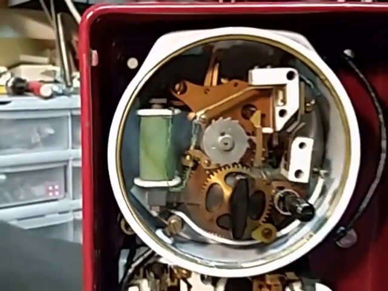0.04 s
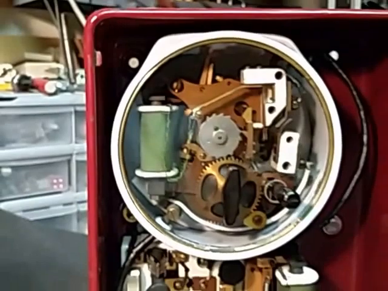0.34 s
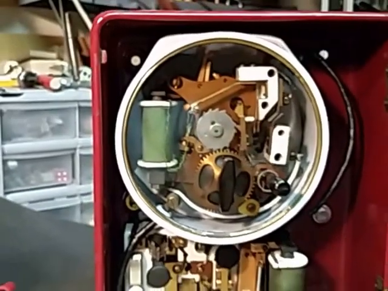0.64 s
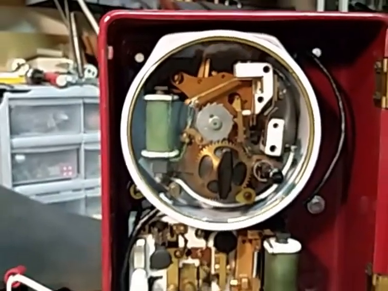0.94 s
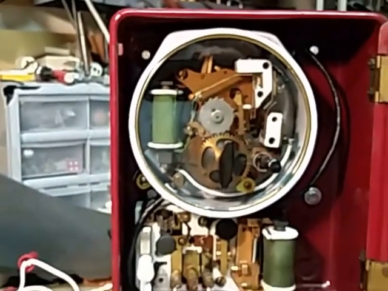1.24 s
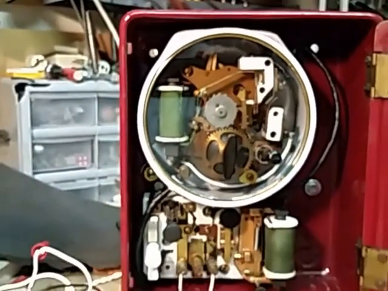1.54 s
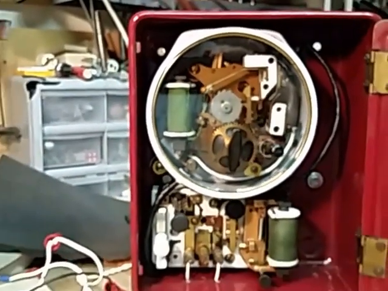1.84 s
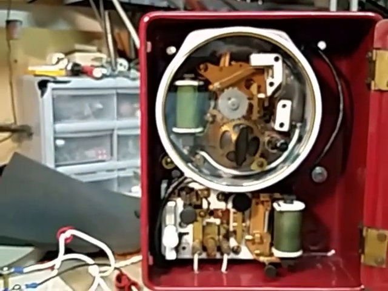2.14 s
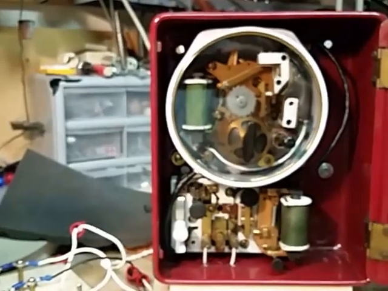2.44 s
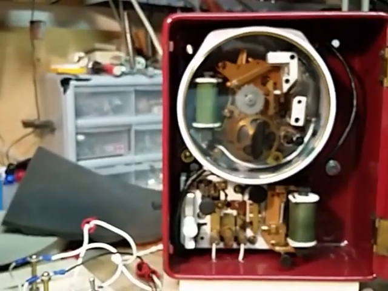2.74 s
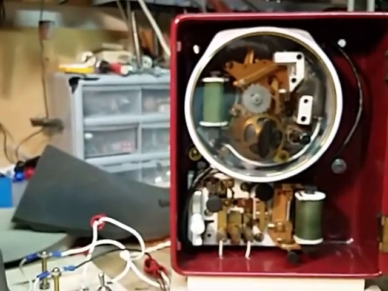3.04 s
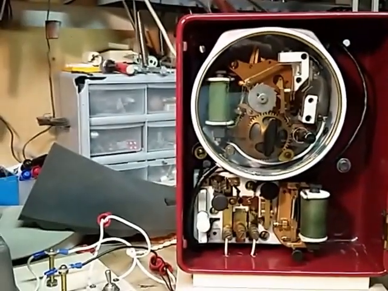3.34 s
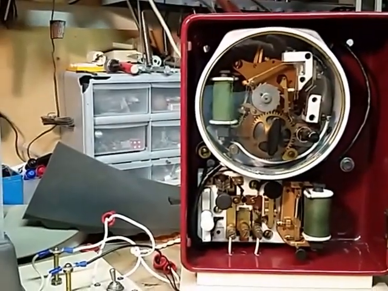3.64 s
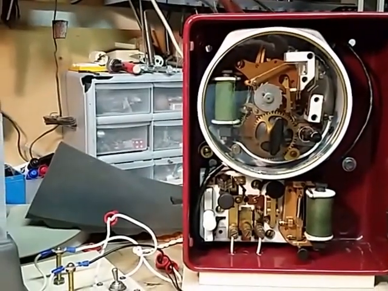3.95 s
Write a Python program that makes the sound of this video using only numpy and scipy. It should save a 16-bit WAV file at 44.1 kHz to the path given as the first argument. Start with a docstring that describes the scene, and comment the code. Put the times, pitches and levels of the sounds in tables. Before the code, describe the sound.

Brass clockwork ticks rapidly in a steel case, with two louder lever clacks.

```python
"""In a workshop, close by, a brass clockwork runs down in a steel case. Its pallet strikes the escape
wheel about twelve times a second, swings back with a lighter tap and often rattles once more. Twice,
two seconds apart, a lever knocks as it lifts, then drops with a loud, bouncing clack. Each blow rings
the plates (bright) and the case (hollow). The ticking shifts colour as the microphone backs away,
and faint room air lies underneath."""
import sys
import numpy as np
from scipy import signal
from scipy.fft import rfft, irfft
from scipy.io import wavfile

SR = 44100
rng = np.random.default_rng(int(sys.argv[2]) if len(sys.argv) > 2 else 0)


def transcribe(signal):
    """Save signal, clipped to [-1, 1], as a 16-bit WAV file at the path in sys.argv[1]."""
    frames = np.atleast_2d(signal).T
    limited = np.clip(frames, -1, 1)
    pcm = np.round(limited * 32767).astype(np.int16)
    wavfile.write(sys.argv[1], SR, pcm)


N = 176400

# how alike left and right are (frequency [Hz], correlation [0..1])
STEREO_LIKENESS = [(60,0.9),(170,0.95),(600,0.86),(1200,0.38),(4000,0.077)]
LN_1000 = np.log(1000)  # a decay of 60 dB


def undb(db):
    """Decibels to gain."""
    return 10 ** (np.asarray(db) / 20)


def along(points, hz):
    """Read (frequency [Hz], value) points on a log-frequency axis."""
    freqs, values = np.array(points, float).T
    return np.interp(np.log(np.maximum(hz, 1)), np.log(freqs), values)


def bins():
    """Frequencies of the spectrum of the whole scene."""
    return np.arange(N // 2 + 1) * SR / N


def add(out, start_s, sound):
    """Mix a sound in at its time."""
    i = max(int(start_s * SR), 0)
    out[..., i:i + sound.shape[-1]] += sound[..., :N - i]


def pan(hz):
    """Equal-power left and right gains: each frequency leans its own way."""
    # stereo lean (frequency [Hz], left minus right [dB])
    balance = [(300,-1),(1000,-3),(1450,-8.5),(2100,-1),(3000,3.5),(4000,5),(5000,0.5),(7200,5),(8800,-8),(15000,-9.5)]
    lean = undb(along(balance, hz))
    return np.array([lean, np.ones_like(lean)]) * np.sqrt(2 / (1 + lean ** 2))


def stereo(spectra):
    """Two unrelated spectra become left and right: narrow in the bass, wide in the treble."""
    likeness = along(STEREO_LIKENESS, bins())
    mid = spectra[0] * np.sqrt((1 + likeness) / 2)
    side = spectra[1] * np.sqrt((1 - likeness) / 2)
    return irfft(np.array([mid + side, mid - side]) * pan(bins()), N)


def glint(noise, width_hz, depth_db=6.5):
    """Metallic glint: narrow groups of modes are raised and lowered at random."""
    n = noise.shape[-1]
    hz = np.arange(n // 2 + 1) * SR / n
    ripple = np.interp(hz / width_hz, np.arange(len(hz)), rng.uniform(-0.83, 1, len(hz)))
    gain = undb(depth_db * ripple)
    return irfft(rfft(noise) * gain / np.sqrt(np.mean(gain ** 2)), n)


def contact_chatter(t, envelope, grain_s=0.00198, grain_db=0.5, rebound_fade_s=0.0073):
    """Gain over one blow: the contact chatters, then rebounds faintly after a random delay."""
    grain = np.interp(t / grain_s, np.arange(len(t)), rng.standard_normal(len(t)))
    chatter = undb(-grain_db * grain * np.exp(-t / 0.09))
    since_rebound = t - rng.uniform(0.011, 0.03)
    chatter *= 1 + (since_rebound > 0) * np.exp(-np.abs(since_rebound) / rebound_fade_s)
    return chatter / np.sqrt(np.average(chatter ** 2, weights=envelope ** 2))


def dense_ring(blows, colour, hold_s, decay_scale=1, wet_db=0):
    """Countless close modes, played as noise: each blow dies away, treble first, into the room."""
    # ring by register (centre [Hz], attack [s], base t60 [s], gain [dB], base room send [dB])
    registers = [(92,0.012,0.56,10.5,-8),(435,0.00091,0.17,3,-6),(1210,0.0064,0.11,5,-9),(3900,0.0029,0.098,0,-14.5),(12700,0.0019,0.066,3.5,-23.5)]
    ring_s, room_t60_s, glint_hz, brass_above_hz = 0.3, 0.36, 220, 2500
    common_share = 0.61  # part of the bright ring's power that all blows share
    n = int(ring_s * SR)
    t = np.arange(n) / SR
    common = glint(rng.standard_normal((2, n)), glint_hz / 2)
    envelopes = []
    for _, attack_s, t60, gain_db, room_db in registers:
        direct = np.exp(-LN_1000 * np.maximum(t - hold_s, 0) / (t60 * decay_scale))
        room = undb(room_db + wet_db) * np.exp(-LN_1000 * t / room_t60_s)
        envelopes.append(np.minimum(t / attack_s, 1) * undb(gain_db) * np.hypot(direct, room))
    centres = [row[0] for row in registers]
    tracks = np.zeros((len(centres), 2, N))
    for start, bright_db, case_db in blows:
        fresh = rng.standard_normal((2, n))
        chatter = contact_chatter(t, envelopes[-1])
        brass = np.sqrt(common_share) * common + np.sqrt(1 - common_share) * fresh
        bright = glint(brass, glint_hz) * chatter * undb(bright_db)
        hollow = fresh * undb(case_db)
        for track, envelope, centre in zip(tracks, envelopes, centres):
            add(track, start, envelope * (bright if centre > brass_above_hz else hollow))
    hz = bins()
    # each register crossfades into its neighbours
    bands = [along(list(zip(centres, solo)), hz) for solo in np.eye(len(centres))]
    spectrum = sum(rfft(track) * band for track, band in zip(tracks, bands))
    return stereo(spectrum * undb(along(colour, hz)))


def ring_modes(times_s, levels_db, modes, scatter=0.2):
    """Single ringing modes, struck with a slightly different force and a random sign by every blow."""
    onsets = np.clip((times_s * SR).astype(int), 0, N - 1)
    out = np.zeros((2, N))
    for hz, mode_db, t60 in modes:
        force, polarity = rng.standard_normal((len(onsets), 2)).T
        hits = np.zeros(N)
        np.add.at(hits, onsets, undb(levels_db + mode_db) * (1 + scatter * force) * np.sign(polarity))
        pole = np.exp((2j * np.pi * hz - LN_1000 / t60) / SR)
        ring = signal.lfilter([1], [1, -pole], hits)
        # a phase offset between left and right gives width
        spread = np.exp(0.5j * np.arccos(along(STEREO_LIKENESS, hz)) * rng.choice([-1, 1]))
        out += pan(hz)[:, None] * np.array([(ring * spread).imag, (ring / spread).imag])
    return out


def escapement():
    """Stroke, back swing and rattle all ring the brass; the first two also sound the case's notes."""
    # pallet strikes on the escape wheel (time [s], level [dB])
    stroke_cues = [(0.003, -20), (0.054, -18), (0.136, -18), (0.217, -17), (0.302, -17), (0.387, -17),
                   (0.471, -18), (0.552, -17), (0.629, -17), (0.712, -18), (0.796, -17), (0.962, -22),
                   (1.043, -23), (1.124, -22), (1.204, -23), (1.286, -22), (1.371, -23), (1.455, -23),
                   (1.538, -23), (1.62, -22), (1.704, -24), (1.795, -23), (1.875, -23), (1.965, -24),
                   (2.053, -21), (2.143, -17), (2.22, -24), (2.32, -17), (2.402, -17), (2.485, -16),
                   (2.567, -14), (2.65, -16), (2.732, -16), (2.812, -17), (2.888, -16), (2.971, -15),
                   (3.139, -22), (3.219, -25), (3.303, -24), (3.386, -28), (3.467, -26), (3.551, -28),
                   (3.636, -28), (3.719, -28), (3.8, -28), (3.88, -26), (3.961, -24)]
    # lighter taps of the back swing (time [s], level [dB])
    tap_cues = [(0.087, -20), (0.166, -20), (0.251, -19), (0.336, -20), (0.415, -18), (0.503, -18),
                (0.583, -18), (0.664, -22), (0.746, -18), (0.829, -17), (0.994, -22), (1.074, -22),
                (1.157, -28), (1.237, -24), (1.319, -26), (1.4, -28), (1.487, -26), (1.571, -27),
                (1.653, -28), (1.74, -26), (1.824, -23), (1.913, -22), (2.003, -25), (2.091, -20),
                (2.18, -19), (2.269, -19), (2.353, -18), (2.435, -19), (2.517, -19), (2.592, -21),
                (2.684, -20), (2.765, -18), (2.846, -17), (2.921, -18), (3.004, -14), (3.173, -28),
                (3.252, -27), (3.418, -32), (3.5, -32), (3.584, -33), (3.668, -29), (3.75, -30),
                (3.832, -30), (3.911, -29), (3.992, -25)]
    # loose rattles between strokes (time [s], level [dB])
    rattle_cues = [(0.119, -26), (0.192, -24), (0.38, -23), (0.456, -21), (0.531, -19), (0.607, -19),
                   (0.681, -19), (1.02, -29), (1.097, -29), (1.365, -26), (1.44, -29), (1.516, -28),
                   (1.592, -27), (1.757, -27), (1.84, -26), (1.953, -27), (1.993, -25), (2.03, -29),
                   (2.07, -23), (2.233, -16), (2.295, -23), (2.371, -22), (2.447, -19), (2.477, -23),
                   (2.553, -24), (2.626, -24), (3.292, -29), (3.337, -27)]
    # EQ of the tick's dense ring (frequency [Hz], gain [dB])
    tick_colour = [(75,-8),(120,-12.5),(190,-9.5),(300,-0.5),(500,-3.5),(780,3),(1050,9.5),(1330,-3),(1700,2.5),(2050,1),(2350,-4),(3150,-11.5),(3850,0.5),(5400,-7),(7500,-7),(8800,-1),(10700,-3.5),(12000,1.5),(13500,-3),(15300,2)]
    # hollow notes of the steel case (frequency [Hz], level [dB], t60 [s])
    case_modes = [(173.5,-13,0.28),(285,-12.5,0.23),(457.3,-20,0.52),(594,-10.5,0.077),(688.4,-9,0.21),(763,-20,0.3),(964.5,-1.5,0.12),(1130,-6,0.14),(1180,-15.5,0.11),(1483,-6.5,0.077),(1661,-9,0.18),(2023,-15,0.39)]
    # shimmer of the wheel and plates (frequency [Hz], level [dB], t60 [s])
    brass_modes = [(3820,-24,.06),(8470,-25,.1),(9119,-21,.1),(9470,-23,.16),(11020,-22,.1),(11680,-15,.08),(12160,-21,.09),(12525,-22,.14),(14830,-20,.1),(15005,-19,.11)]
    case_lag_s = 0.001964
    # each cue becomes a blow (time [s], bright level [dB], case level [dB])
    strokes = np.array([(s, db + 1.5, db - 10.5) for s, db in stroke_cues])
    taps = np.array([(s, db + 1, db - 10) for s, db in tap_cues])
    rattles = np.array([(s, db, db - 6.5) for s, db in rattle_cues])
    ticks = dense_ring(strokes, tick_colour, hold_s=0.005)
    ticks += dense_ring(taps, tick_colour, hold_s=0.006, decay_scale=0.97)
    ticks += dense_ring(rattles, tick_colour, hold_s=0.003, decay_scale=0.45)
    case = ring_modes(strokes[:, 0] + case_lag_s, strokes[:, 2], case_modes)
    case += undb(-4) * ring_modes(taps[:, 0] + case_lag_s, taps[:, 2], case_modes)
    times_s, bright_db, _ = np.vstack([strokes, taps, rattles]).T
    return ticks + case + ring_modes(times_s, bright_db, brass_modes)


def workshop_air(level_db=-53.5):
    """Faint, steady room tone, heaviest in the lows."""
    # EQ of the air (frequency [Hz], gain [dB])
    air_colour = [(25,-4),(70,-8),(400,-10.5),(3000,-14.5),(15000,-23)]
    air = stereo(rfft(rng.standard_normal((2, N))) * undb(along(air_colour, bins())))
    return air / air.std() * undb(level_db)


def retreat(sound, move_s=(0.53, 2.6)):
    """The microphone backs away and picks up the modes of the case in other proportions."""
    # colour shift over the move (frequency [Hz], far minus near [dB])
    colour_shift = [(190,-1),(285,5.5),(380,-8.5),(690,3.5),(1050,-3),(2800,-1),(4000,0.5),(6000,-2.5),(8800,-0.5)]
    half_shift = undb(along(colour_shift, bins()) / 2)
    spectrum = rfft(sound)
    near, far = irfft(spectrum / half_shift, N), irfft(spectrum * half_shift, N)
    fade = np.interp(np.arange(N) / SR, move_s, (0, 1))
    return (1 - fade) * near + fade * far


def lever(centring_db=1):
    """Dull, scraping knocks as it lifts, then a bouncing clack as it drops."""
    # knocks of the lift (time [s], thud level [dB], hollow ring level [dB])
    knocks = [(.635,-17,-38),(.65,-17,-49),(.687,-28,-21.5),(1.805,-50,-29),(2.888,-13,-22),(2.902,-18,-41),(2.942,-27,-20)]
    # EQ of the thud (frequency [Hz], gain [dB])
    knock_colour = [(100,-20),(480,-14.5),(780,-2),(1200,-6.5),(2900,-0.5),(3400,-10)]
    # dull notes of the lifting lever (frequency [Hz], level [dB], t60 [s])
    knock_modes = [(698,-3,0.15),(808,-7.5,0.12)]
    # a pallet stroke just before the first drop, then the drops and their bounces (time [s], bright level [dB],
    # case level [dB])
    clacks = [(0.867,-13,-25),(0.881,-14,-24),(0.897,-8,-18.5),(0.906,-8.5,-14),(.913,-19.5,-18),(3.007,-14,-21),(3.037,-9.5,-17.5),(3.046,-9,-21),(3.052,-17,-11),(3.087,-19,-23)]
    # EQ of the clack (frequency [Hz], gain [dB])
    clack_colour = [(100,-21.5),(500,-14.5),(1050,-5.5),(1600,-4.5),(3000,-7.5),(11500,-2.5),(14200,3.5)]
    # brighter notes of the dropping lever (frequency [Hz], level [dB], t60 [s])
    clack_modes = [(943,-9,0.079),(1083,-4,0.074),(1817,-10,0.08)]
    thuds = [(s, db, db) for s, db, _ in knocks]
    knock_s, _, hollow_db = np.array(knocks).T
    lift = dense_ring(thuds, knock_colour, hold_s=0.006, decay_scale=0.68)
    lift += ring_modes(knock_s, hollow_db, knock_modes)
    clack_s, _, case_db = np.array(clacks).T
    drop = dense_ring(clacks, clack_colour, hold_s=0.0011, decay_scale=0.78, wet_db=3.5)
    drop += ring_modes(clack_s, case_db, clack_modes)
    # the clack sits slightly nearer the centre than the right-leaning ticking
    return lift + drop * undb(np.array([[centring_db], [-centring_db]]) / 2)


def scene():
    """Ticking and lever over a bed of room air."""
    return retreat(escapement()) + lever() + workshop_air()


def record(dry):
    """Soft saturation rounds the loudest peaks; a steep low-pass trims the very top."""
    ceiling, top_hz = 0.75, 15750
    lowpass = signal.ellip(10, 0.2, 70, top_hz, fs=SR, output="sos")
    return signal.sosfilt(lowpass, ceiling * np.tanh(dry / ceiling))


dry = scene()
out = record(dry)
transcribe(out)
```